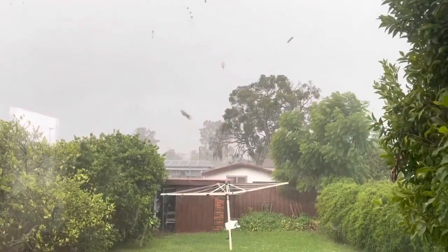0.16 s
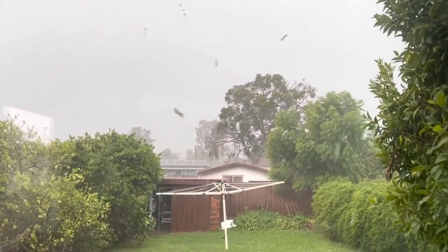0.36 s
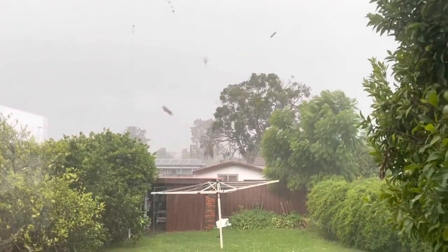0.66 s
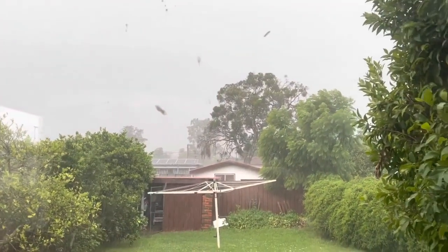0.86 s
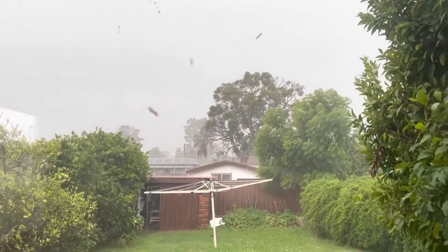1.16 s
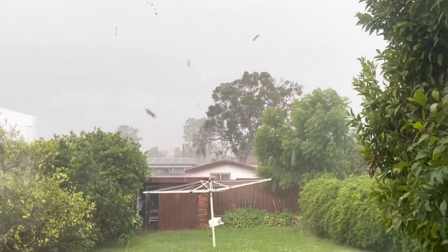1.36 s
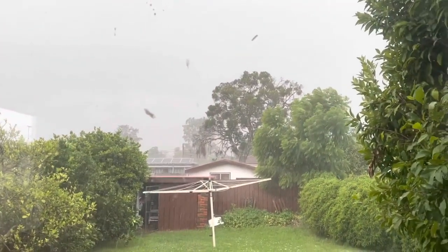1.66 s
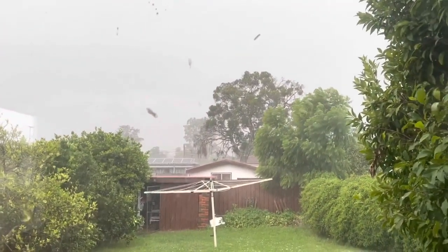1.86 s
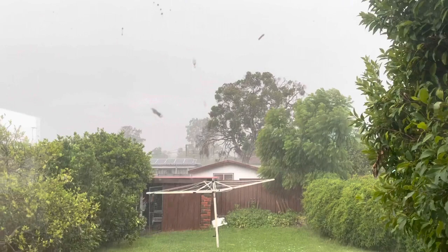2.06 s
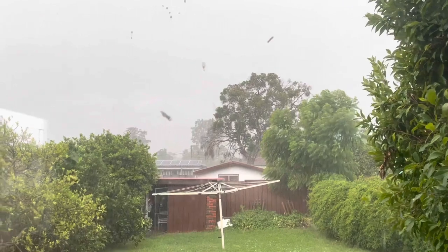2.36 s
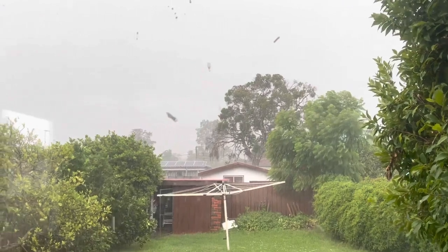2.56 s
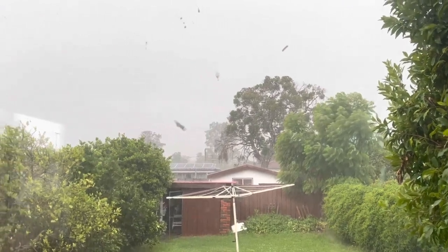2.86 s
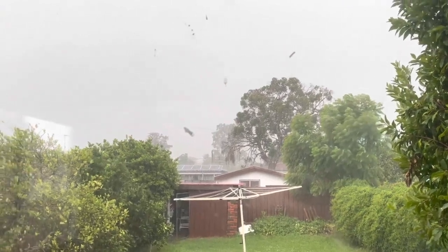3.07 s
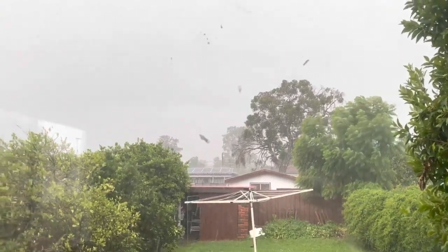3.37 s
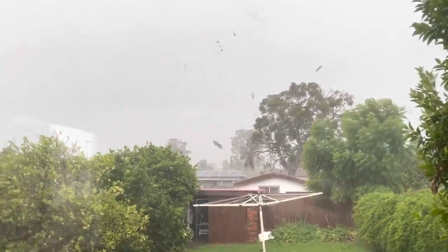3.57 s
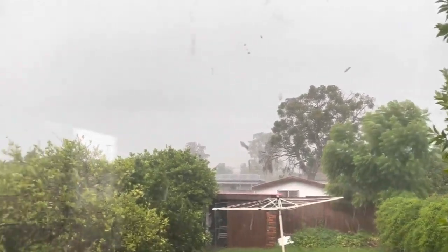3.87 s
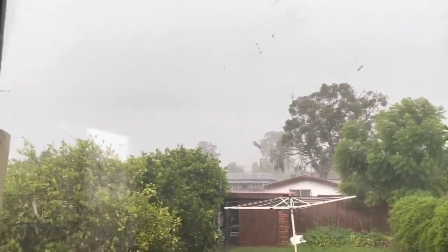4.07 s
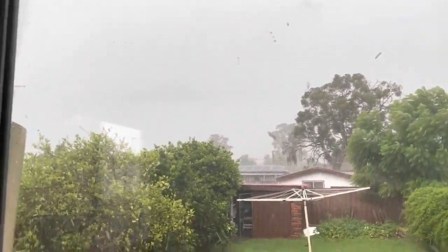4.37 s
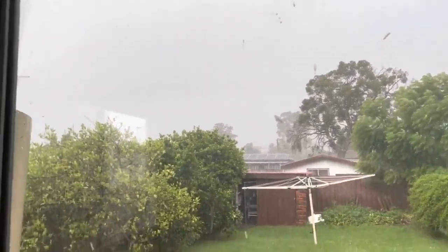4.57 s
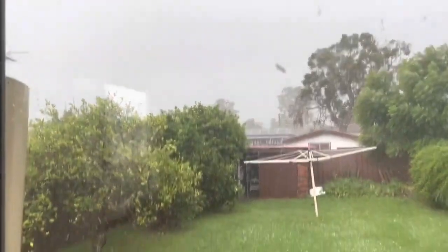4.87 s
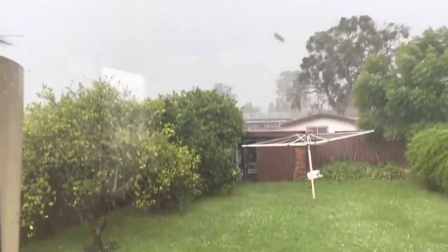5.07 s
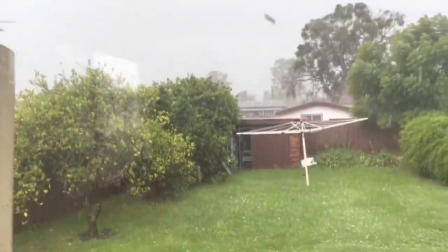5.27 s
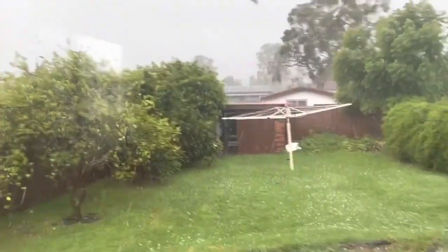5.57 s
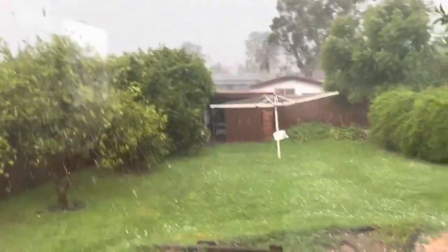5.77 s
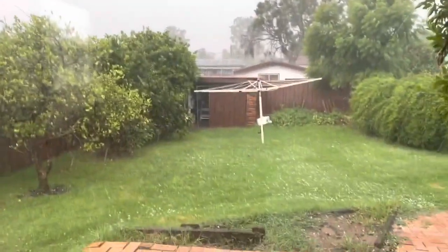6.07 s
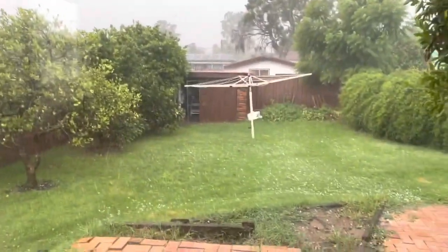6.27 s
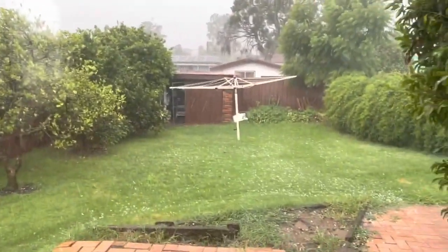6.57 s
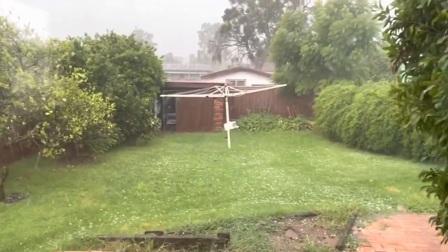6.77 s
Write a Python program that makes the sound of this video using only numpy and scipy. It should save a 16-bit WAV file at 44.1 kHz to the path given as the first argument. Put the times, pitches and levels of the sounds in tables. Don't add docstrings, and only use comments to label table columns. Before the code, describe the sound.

A dense downpour hisses and patters in quick gusts, with scattered hail knocks, one brief metallic ring, and continuous soft, deep thunder underneath.

```python
import sys
import numpy as np
from scipy import signal
from scipy.fft import rfft, irfft, next_fast_len
from scipy.io import wavfile
from scipy.ndimage import uniform_filter1d

SR = 44100
rng = np.random.default_rng(int(sys.argv[2]) if len(sys.argv) > 2 else 0)


def makeup_ratio(level_db):
    decades = np.asarray(level_db, float) / 20
    return 10 ** decades


def wrap_up_sound(samples):
    columns = np.atleast_2d(samples).T
    tamed = np.clip(columns, -1, 1)
    steps = np.round(tamed * 32767).astype(np.int16)
    wavfile.write(sys.argv[1], SR, steps)


N = 305613


def evened(x):
    return x / np.sqrt(np.mean(x ** 2) + 1e-20)


def read(points, hz):
    point_hz, value = np.transpose(points)
    return np.interp(np.log(hz + 1), np.log(point_hz + 1), value)


def impact_sizes(per_s, spread_db, most):
    size = makeup_ratio(spread_db * np.minimum(rng.exponential(1, N), most))
    return size * (rng.random(N) < per_s / SR)


def impacts(per_s, spread_db, t60_s):
    size = impact_sizes(per_s, spread_db, most=4)
    kept_per_sample = makeup_ratio(-120 / (t60_s * SR))
    power = signal.lfilter([1], [1, -kept_per_sample], size ** 2)
    return evened(np.sqrt(power) * rng.standard_normal((2, N)))


def shaped(x, field_db, size):
    overlap = size * 3 // 4
    hz, t, z = signal.stft(x, SR, nperseg=size, noverlap=overlap)
    z = z * makeup_ratio(field_db(t, hz))
    y = signal.istft(z, SR, nperseg=size, noverlap=overlap)[1]
    return evened(y[:, :N])


def drift(t, hz, bins, frames):
    field = rng.standard_normal((len(t), len(hz))).T
    field = uniform_filter1d(field, size=bins, axis=0)
    return evened(uniform_filter1d(field, size=frames, axis=1))


def swells(events, t, hz, octaves):
    peak_s, db, pitch_hz, fade_s = np.transpose(events)[:, :, None]
    u = (t - peak_s) / fade_s
    rise_share = 0.83
    shape = np.exp(-np.where(u < 0, u / rise_share, u) ** 2 / 2)
    away = np.log2((hz + 1) / pitch_hz) / octaves
    reach = makeup_ratio(db) ** 2 * np.exp(-away ** 2 / 2)
    level_db = 10 * np.log10(1 + reach.T @ shape)
    return level_db - level_db.mean(1, keepdims=True)


def add(mix, s, sound):
    part = mix[:, round(s * SR):][:, :sound.shape[1]]
    part += sound[:, :part.shape[1]]


# peak in seconds, level in dB over the steady rumble, pitch in Hz, fade in seconds.
THUNDER_ROLLS = [(0.03, 9, 70, 0.025), (0.3, 6, 132, 0.28), (1.26, 9.5, 50, 0.2), (1.45, 6.5, 130, 0.37),
                 (2.17, 4.2, 90, 0.09), (2.47, 7, 120, 0.092), (2.76, 7.5, 110, 0.057),
                 (3.2, 3.5, 130, 0.34), (3.43, 4, 70, 0.052), (3.74, 6, 110, 0.16), (4.13, 4, 80, 0.071),
                 (4.6, 5.5, 101, 0.14), (4.81, 5, 70, 0.052), (4.94, 5.5, 190, 0.047),
                 (5.17, 3.5, 150, 0.097), (5.44, 7, 50, 0.17), (5.8, 5, 70, 0.2), (6.22, 9.5, 70, 0.15),
                 (6.4, 8.5, 50, 0.085), (6.48, 6.5, 50, 0.34)]
# frequency in Hz, density in dB per Hz.
RUMBLE_COLOUR = [(20, -26), (30, -8), (45, -19), (70, 3), (95, -1), (140, -4.5), (210, -10), (320, -15),
                 (600, -48)]


def thunder():
    thuds = impacts(per_s=810, spread_db=1.0, t60_s=0.2)

    def field_db(t, hz):
        return read(RUMBLE_COLOUR, hz)[:, None] + 1.36 * swells(THUNDER_ROLLS, t, hz, octaves=0.99)
    return makeup_ratio(-24.5) * shaped(thuds, field_db, size=2048)


# peak in seconds, level in dB over the steady fall, surface pitch in Hz, fade in seconds.
RAIN_SHEETS = [(0.0, 4.0, 3220, 0.056), (0.23, 3.5, 2170, 0.021), (0.38, 3.5, 1720, 0.068),
               (0.65, 3, 2000, 0.1), (0.94, 2, 1100, 0.061), (1.23, 0, 2530, 0.11), (1.45, 3, 2220, 0.076),
               (1.57, 5.5, 2600, 0.017), (2.1, 2, 1300, 0.32), (2.52, 1.5, 2020, 0.031),
               (2.71, 3.5, 1260, 0.031), (2.82, 1, 2270, 0.051), (3.0, 5, 1700, 0.051),
               (3.17, 1, 1120, 0.059), (3.38, 6.5, 1200, 0.036), (3.63, 3.0, 1530, 0.099),
               (3.89, -2.5, 1800, 0.052), (4.05, 2.2, 1680, 0.039), (4.19, 1.5, 1890, 0.044),
               (4.73, 0.5, 1220, 0.048), (4.89, 1.5, 1590, 0.043), (5.11, 1.6, 2020, 0.078),
               (5.39, 2.5, 2640, 0.069), (5.54, 4, 2440, 0.068), (5.83, 4.5, 1480, 0.05),
               (6.0, -0.5, 3300, 0.029), (6.1, -0.7, 1360, 0.041), (6.33, 3.1, 2560, 0.075),
               (6.57, 2.2, 1870, 0.08), (6.84, 2.5, 1470, 0.062)]
# frequency in Hz, density in dB per Hz.
RAIN_COLOUR = [(200, -1.5), (300, -0.3), (450, 0), (800, 1.37), (1650, -0.4), (1950, -1.5), (3200, -5.5),
               (4500, -9.5), (6500, -14), (8000, -18), (10000, -25.5), (12000, -32), (13200, -29),
               (15500, -40)]


def rain():
    far = impacts(per_s=7500, spread_db=0.5, t60_s=0.041)
    near = impacts(per_s=400, spread_db=0.5, t60_s=0.0088)

    def field_db(t, hz):
        fine = 1.1 * drift(t, hz, bins=8, frames=16)
        broad = 0.51 * drift(t, hz, bins=30, frames=10)
        bass_cut = -30 * np.maximum(np.log2(200 / (hz + 1)), 0)
        colour = (read(RAIN_COLOUR, hz) + bass_cut)[:, None]
        return colour + 1.1 * swells(RAIN_SHEETS, t, hz, octaves=1.4) + fine + broad
    return makeup_ratio(-21) * shaped(far + makeup_ratio(-13.0) * near, field_db, size=512)


def patter():
    size = impact_sizes(per_s=300, spread_db=3.0, most=3)
    struck = rng.integers(0, 30, N)
    t, t60_s, rise_s = np.arange(3000) / SR, 0.1, 0.0037
    out = np.zeros((2, N))
    for k, hz in enumerate(np.geomspace(700, 5000, 30)):
        level = makeup_ratio(read(RAIN_COLOUR, hz) - 60 * t / t60_s) * np.sqrt(hz)
        ring = level * np.sin(2 * np.pi * hz * t) * np.minimum(t / rise_s, 1)
        out[k % 2] += signal.oaconvolve(size * (struck == k), ring)[:N]
    return makeup_ratio(-31.5) * evened(out)


def burst(s, peak_db, hz, width_hz, length_s, mix):
    t = np.arange(6000) / SR
    body = np.exp(-(t / length_s) ** 3)
    tail = 0.49 * np.exp(-t / (2 * length_s))
    shape = (1 - np.exp(-t / 0.00064)) * (body + tail)
    r = np.exp(-np.pi * width_hz / SR)
    poles = [1, -2 * r * np.cos(2 * np.pi * hz / SR), r * r]
    ring = rng.standard_normal((2, 6000))
    for _ in range(2):
        ring = signal.lfilter([1, 0, -1], poles, ring)
    add(mix, s, makeup_ratio(peak_db - 12.5) * shape * evened(ring))


# start in seconds, level in dB, pitch in Hz, t60 in seconds.
METAL_RING = (2.94, -23, 2756, 0.6)


def metal_ring(mix):
    s, db, hz, t60_s = METAL_RING
    t = np.arange(12000) / SR
    tone = makeup_ratio(db - 60 * t / t60_s) * np.sin(2 * np.pi * hz * t)
    add(mix, s, tone * np.array([[1], [0.28]]))


# start in seconds, peak in dB, pitch in Hz, ring width in Hz, length in seconds.
NEAR_STONES = [(0.344, -18, 3700, 900, 0.02), (0.61, -11, 2150, 900, 0.024), (0.948, -10, 1150, 900, 0.028),
               (1.5304, -34, 1730, 900, 0.02), (2.214, -12, 1550, 900, 0.014),
               (2.545, -17, 1500, 910, 0.02), (2.931, -7, 2460, 1960, 0.029),
               (3.616, -12.5, 2880, 900, 0.023), (4.058, -12, 1480, 700, 0.051),
               (4.746, -13, 2340, 900, 0.023), (5.338, -13, 3320, 920, 0.0081),
               (5.358, -15, 3160, 900, 0.017), (6.338, -14, 3000, 900, 0.026)]
# start in seconds, peak in dB, pitch in Hz, ring width in Hz,
# length in seconds.
SMALL_PINGS = [
    (0.1211, -35, 9860, 504, 0.008),
    (0.4459, -61, 9340, 500, 0.008),
    (2.793, -33, 9880, 500, 0.008),
    (3.1637, -30, 9540, 503, 0.008),
    (6.581, -21, 9250, 530, 0.0094),
]


def hail():
    mix = patter()
    for row in NEAR_STONES + SMALL_PINGS:
        burst(*row, mix)
    metal_ring(mix)
    return mix


# frequency in Hz, likeness from 0 to 1.
PORT_LIKENESS = [(110, 0.975), (200, 0.83), (450, 0.51), (1000, 0.46), (1400, 0.37), (1700, 0.54),
                 (2000, 0.17), (2500, 0.22), (3000, 0.52), (4400, 0.52), (5200, 0.34), (6200, 0.57),
                 (7300, 0.55)]
# frequency in Hz, lead in radians.
LEFT_LEAD = [(0, 0), (260, -0.2), (780, -1.8), (1640, -2.0), (2840, -5.4), (3960, -6.4), (5000, -5.8),
             (6550, -7.0), (7670, -9.3), (8870, -9.4), (10400, -12.6), (13000, -12.5), (13400, -15.6),
             (13600, -15.7)]
# frequency in Hz, left minus right in dB.
PORT_TILT = [(60, 1.0), (98, 1.0), (160, 1.5), (260, -0.5), (430, -0.5), (700, -0.5), (1150, -1.5),
             (1880, 0.0), (3080, 1.5), (5030, 2.0), (8230, 0.5), (13500, 0.0)]


def ports(streams):
    size = next_fast_len(N)
    hz = np.fft.rfftfreq(size, 1 / SR)
    shared, other = rfft(streams, size)
    same = np.clip(read(PORT_LIKENESS, hz), 0, 1)
    lead = np.interp(hz, *np.transpose(LEFT_LEAD))
    right = same * np.exp(-1j * lead) * shared + np.sqrt(1 - same ** 2) * other
    tilt = makeup_ratio(read(PORT_TILT, hz) / 2)
    return irfft(np.array([shared * tilt, right / tilt]), size)[:, :N]


def scene():
    return ports(rain() + hail() + thunder())


def top_cut(x):
    return signal.sosfilt(signal.butter(12, 15750, fs=SR, output="sos"), x)


# low edge in Hz, high edge in Hz.
DIFFERENCE_ONLY = [(7650, 8900), (13800, 22000)]
# low edge in Hz, high edge in Hz.
SUM_ONLY = [(10350, 13100)]
# gap's upper edge in Hz, top in Hz.
STRAY_HZ = [250, 450]
# low edge in Hz, high edge in Hz.
THINNING_HZ = (11000, 13000)


def record(dry):
    hz, t, (left, right) = signal.stft(dry, SR, nperseg=2048)
    hz = hz[:, None]
    gap_stray, top_stray = (np.round(rng.standard_normal((len(t), 2))) * STRAY_HZ).T
    gap_stray = gap_stray * (abs(gap_stray) > STRAY_HZ[0])
    (gap_lo, gap_hi), (top, _) = DIFFERENCE_ONLY
    mid = (left + right) / 2 * ((hz < gap_lo) | (hz > gap_hi + gap_stray))
    threshold = np.interp(hz, THINNING_HZ, [-1.6, 1.1], left=-np.inf)
    clumps = drift(t, hz, bins=8, frames=2) > threshold
    mid = mid * clumps * (hz < top + top_stray)
    side = (left - right) / 2
    for lo, hi in SUM_ONLY:
        side = side * ((hz < lo) | (hz > hi))
    side = side * ((hz < THINNING_HZ[0]) | (drift(t, hz, bins=8, frames=2) > 0.2))
    kept = signal.istft(np.array([mid + side, mid - side]), SR, nperseg=2048)[1]
    return top_cut(kept[:, :N])


dry = scene()
out = record(dry)
wrap_up_sound(out)
```